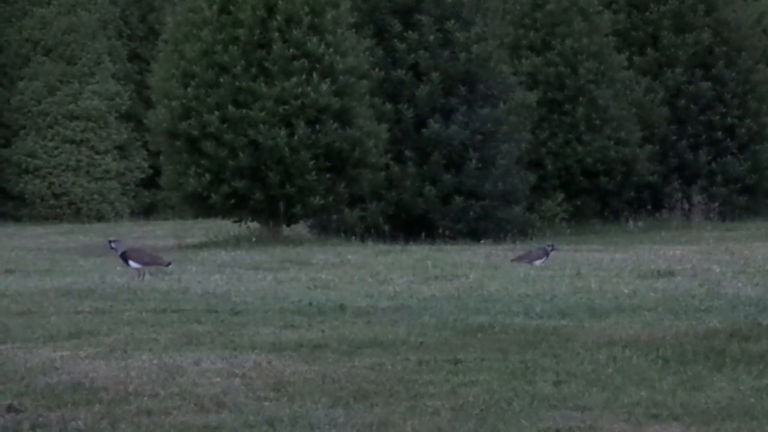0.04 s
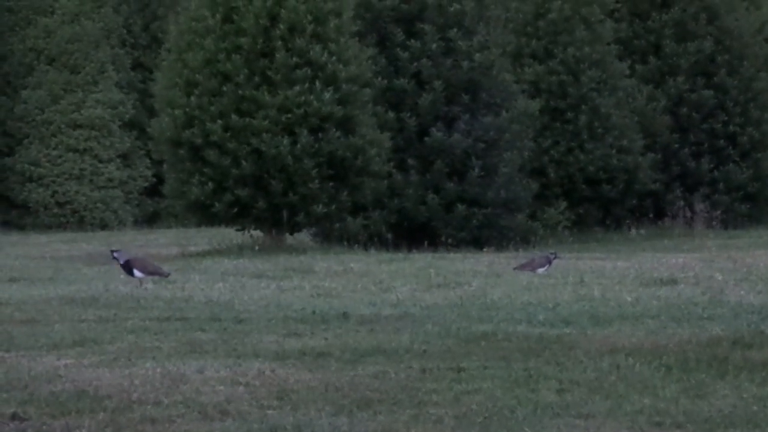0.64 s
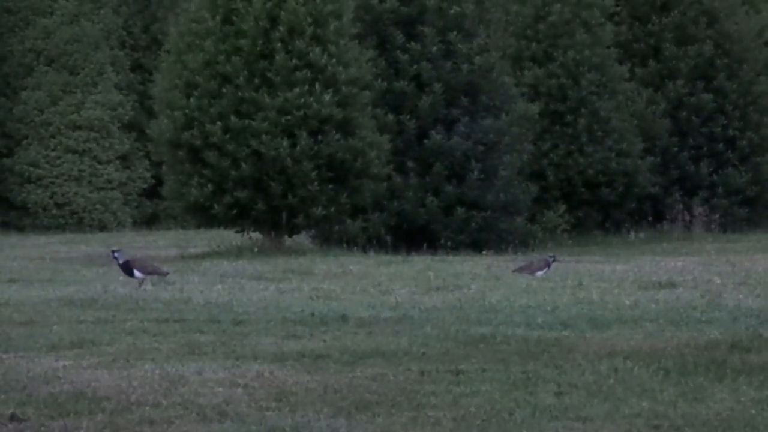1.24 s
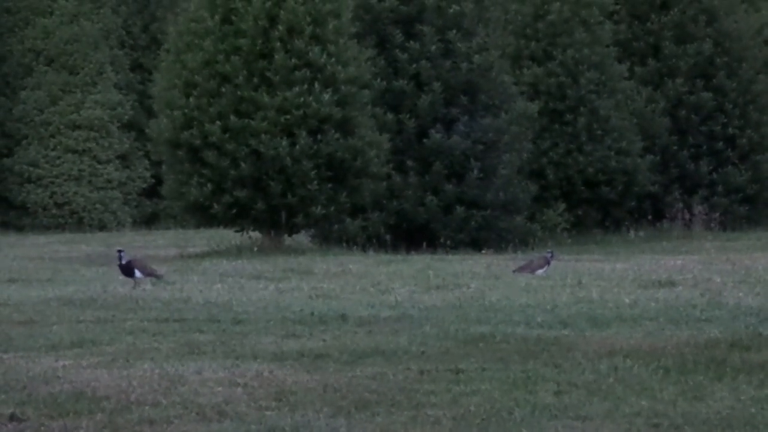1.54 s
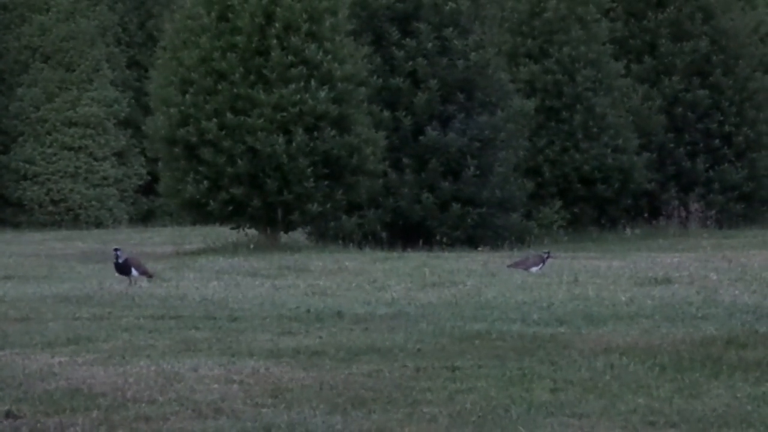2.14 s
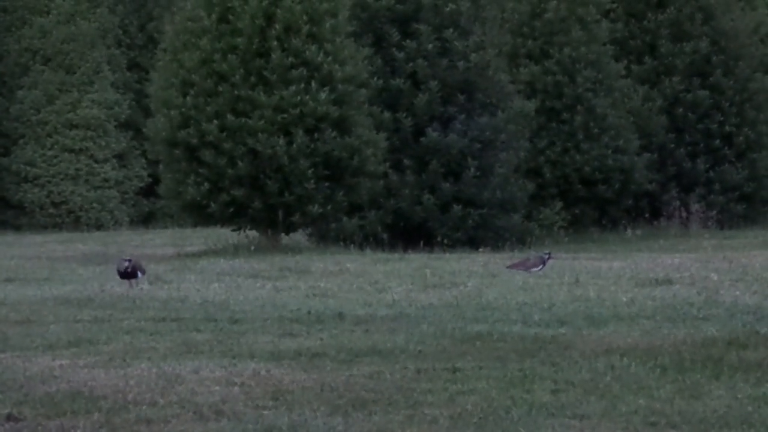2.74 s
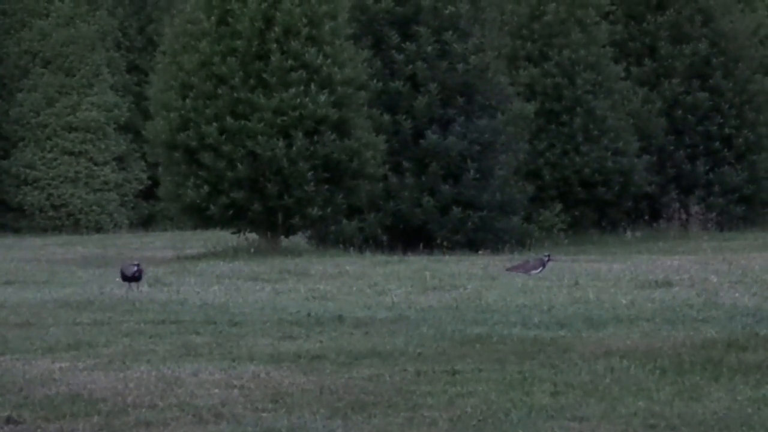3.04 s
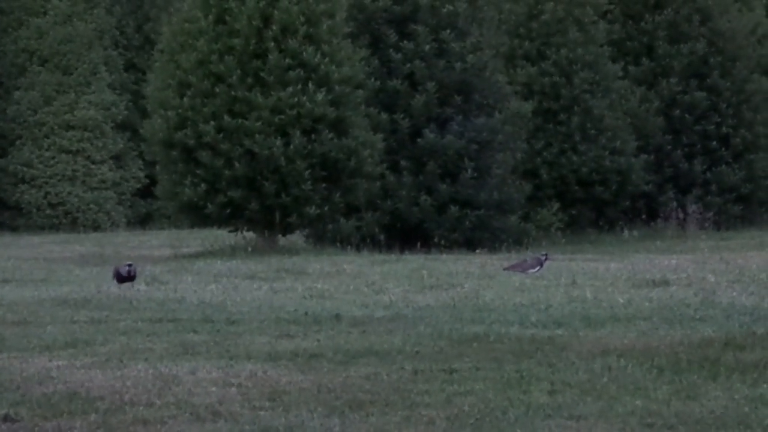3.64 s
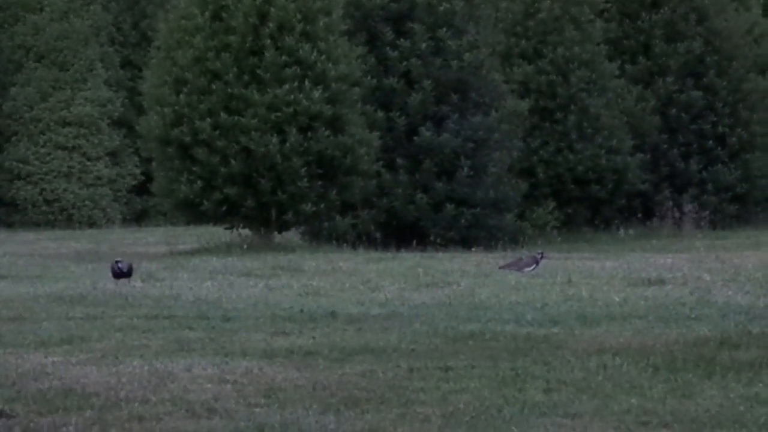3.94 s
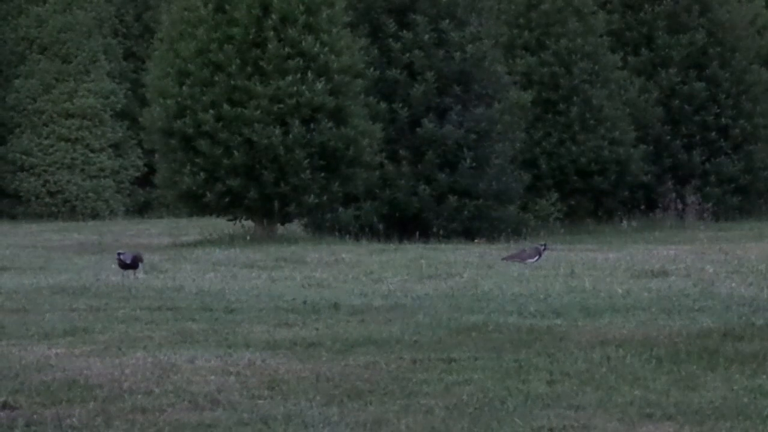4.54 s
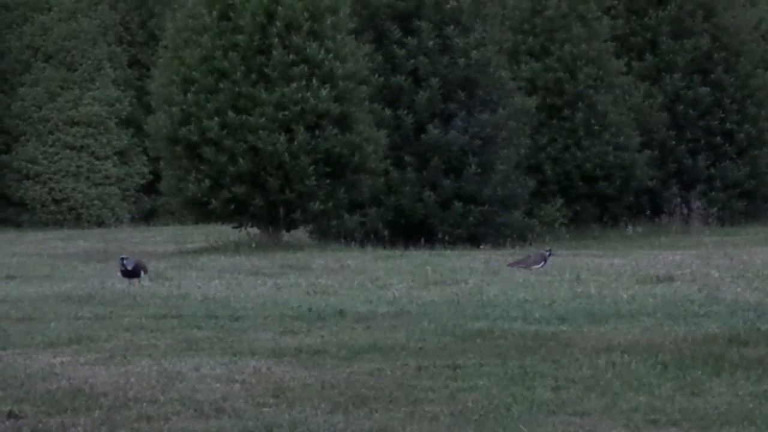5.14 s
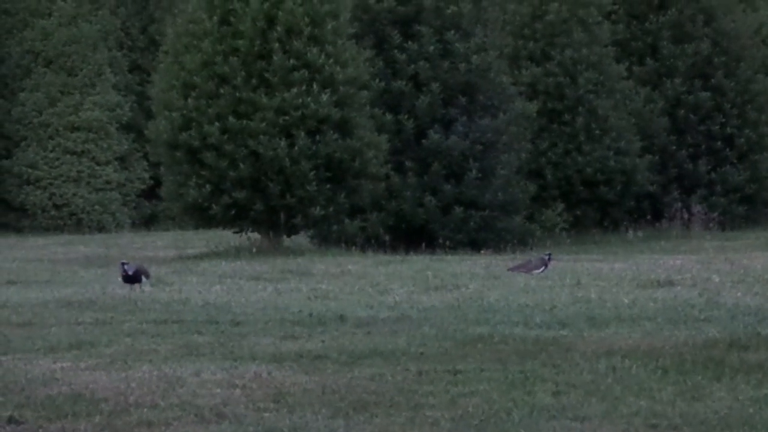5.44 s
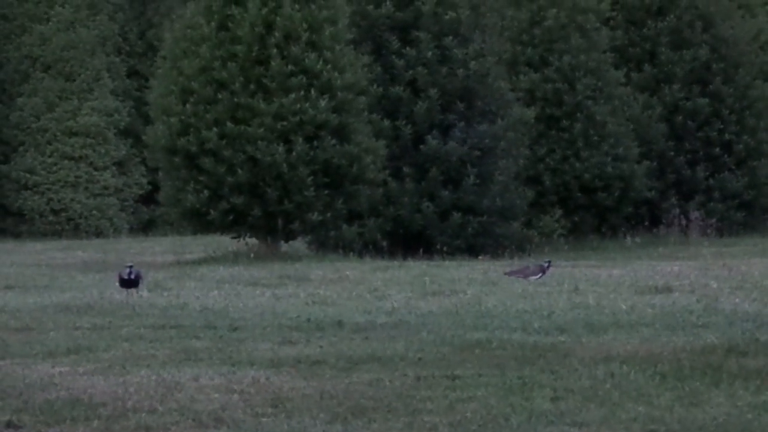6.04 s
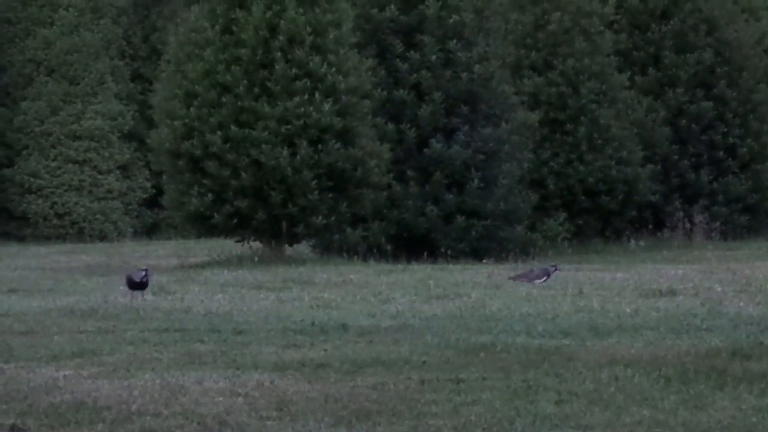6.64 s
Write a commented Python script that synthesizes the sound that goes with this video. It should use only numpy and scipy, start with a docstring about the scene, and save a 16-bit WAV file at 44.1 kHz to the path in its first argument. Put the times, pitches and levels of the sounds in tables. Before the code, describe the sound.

A lapwing repeats harsh, scratchy cries outdoors, with faint songbird whistles and two dull knocks over a distant rush and low hum.

```python
"""A lapwing's harsh cry sounds ten times over a lawn at dusk; a second bird answers once, more softly.
Each cry is a reedy harmonic series from the syrinx, filtered by throat and bill, whose pitch flicks
upward in an uneven rattle. The ground and the tree line reflect it. A distant songbird whistles in
gliding pure tones, something knocks twice, and a far rush with a low hum lies under everything."""
import sys
import numpy as np
from scipy import signal
from scipy.fft import rfft, irfft, next_fast_len
from scipy.io import wavfile
from scipy.ndimage import uniform_filter1d, map_coordinates

SR = 44100
rng = np.random.default_rng(int(sys.argv[2]) if len(sys.argv) > 2 else 0)


def file_out(sig):
    """Save sig as 16-bit WAV at sys.argv[1]."""
    # one column per channel
    cols = np.atleast_2d(sig).T
    # limit, then scale
    lim = np.clip(cols, -1, 1)
    pcm = np.round(lim * 32767).astype(np.int16)
    wavfile.write(sys.argv[1], SR, pcm)


N = 299880

# The near bird's cries: start t/s, end t/s, level/dB, swell/dB, second harmonic/dB, treble/dB,
# resting strain (0-1), closing sag/Hz, flick period/s, rattle duration/s,
# resting pitch f/Hz at each of the four stages, flick height/Hz at each of the last three
CRY_SCORE = [ (-.15, .2, -34.5, 0.56, -10.5, -19, .19, 80, .0305, .33, 930, 945, 934, 915, 60, 45, 170),
             (.499, .85, -34.2, .7, -10.5, -20, .17, 85, .030, .32, 910, 962, 942, 925, 95, 115, 190),
             (1.171, 1.54, -34, 1, -11, -16.5, .2, 150, .0358, .33, 935, 1018, 980, 964, 45, 25, 150),
             (1.878, 2.222, -34, 2.5, -12, -16.5, .08, 150, .0335, .18, 950, 998, 994, 962, 105, 135, 20),
             (2.65, 2.99, -35.3, 1.3, -9.5, -17.5, .09, 45, .0268, .31, 965, 1012, 1005, 965, 70, 55, 50),
             (3.313, 3.66, -35.5, 1.36, -9.5, -16.5, .08, 45, .0315, .17, 985, 1022, 998, 983, 49.5, 25, 20.5),
             (4.007, 4.35, -35.5, 2.1, -8, -16.5, .07, 40, .0305, .23, 1048, 1058, 1072, 1050, 165, 85, 20),
             (4.716, 5.06, -37, 2.6, -9, -16, .08, 45, .0312, .29, 875, 972, 1022, 1002, 65, 150, 180),
             (5.452, 5.775, -35.5, 1.5, -9.5, -16.5, .04, 45, .0315, .14, 1047, 1078, 982, 958, 170, 90, -0.5),
             (6.255, 6.602, -35.5, 2.4, -10.5, -16.5, .08, 105, .0332, .18, 992, 1018, 1013, 987, 55, 95, 14.5)]
# Response of the bird heard side-on: f/Hz, gain/dB
SIDE_ON_RESPONSE = [(2000, -.3), (3000, .6), (4100, -1.8), (5400, 0), (9000, .5), (11500, -2)]

def lapwing(turn_s=2.4):
    """Directivity: the timbre changes as the bird, side-on at first, turns to face the listener."""
    side_on = sum(cry(row) for row in CRY_SCORE if row[0] < turn_s)
    facing = sum(cry(row) for row in CRY_SCORE if row[0] >= turn_s)
    return coloured(side_on, SIDE_ON_RESPONSE) + facing


# Onset, early, middle and late stage of a cry: t/s from its start
STAGE_TIMES = [0, .1, .195, .295]

def cry(row, force=1, onset_s=.005, bite_s=.015, relax_s=.03, sag_s=.019, fade_s=.034):
    """Coupled modulation: each tightening of the syrinx raises the pitch, chokes the level and rasps."""
    start, end, db, swell_db, low_db, treble_db, rest_strain, sag_hz, period, lasts, *shape = row
    pitches, heights = shape[:len(STAGE_TIMES)], shape[len(STAGE_TIMES):]
    out, t = np.zeros(N), span(start, end)
    age, left = t - start, t[-1] - t
    rise_hz = rattle(age, period, lasts, heights, force)
    swing_hz = rise_hz - uniform_filter1d(rise_hz, round(2 * period * SR))
    # pitch and level collapse as the air runs out
    pitch_hz = np.interp(age, STAGE_TIMES, pitches) - sag_hz * np.exp(-left / sag_s) + rise_hz
    spent = np.exp(-left / fade_s)
    level_db = db + swell_db * np.sin(np.pi * age / (end - start)) - 6.5 * np.exp(-age / onset_s)
    level_db -= 7.5 * force * spent + .006 * swing_hz
    low_db += 3 * spent  # the lowest overtone gains on the others
    # strain bites at the onset, grows with the rattle and ebbs once it stops
    rattle_hz = np.interp(age, STAGE_TIMES[1:], heights) * np.exp(-np.maximum(age - lasts, 0) / relax_s)
    effort = rest_strain + .0011 * rattle_hz
    strain = np.maximum(effort + .6 * force * np.exp(-age / bite_s) + .0012 * swing_hz, 0)
    treble_db -= 10 * (effort - effort.mean())  # smooth stretches carry more high overtones
    jitter = .0035 + .017 * strain + .000035 * rise_hz  # the voice cracks atop a high flick
    add(out, t, amp(level_db) * voice(t, pitch_hz, low_db, treble_db, strain, jitter))
    t, scratch = closing_scratch(t[-1], pitch_hz[-1])
    add(out, t, amp(db - 10.5) * scratch)
    return out


# Transfer function of the throat and open bill: f/Hz, gain/dB
THROAT_RESPONSE = [(1600, 3), (2050, 0.5), (2500, -1.5), (3000, 1), (3500, -0.5), (4100, -3.5),
                   (4750, -17.5), (5400, -28.5), (6200, -22), (7000, -23), (8000, -25.5), (9300, -21.5),
                   (11000, -35.5), (14500, -43.5)]
SHRILL_HZ, SHRILL_WIDTH_HZ, SHRILL_DB_PER_STRAIN = 5340, 680, 39.2  # a resonance that strain opens

def voice(t, pitch_hz, low_db, treble_db, strain, jitter, waver=.0035, flutter_db=1.35, grit=.17):
    """Source and filter: harmonics sweep through the throat's resonances; uneven cycles blur them."""
    size = len(t)
    unevenness = jitter * wobble(650, size) + waver * wobble(70.3, size)
    phase = 2 * np.pi * np.cumsum(pitch_hz * (1 + unevenness)) / SR
    shrill_db = SHRILL_DB_PER_STRAIN * np.minimum(strain, .55)
    partials = []
    for k in range(2, 15):  # the fundamental does not carry
        hz = k * pitch_hz
        resonance = np.exp(-((hz - SHRILL_HZ) / SHRILL_WIDTH_HZ) ** 2)
        throat_db = along(THROAT_RESPONSE, hz) + shrill_db * resonance
        sidebands = wobble(500, size) * np.cos(k * phase) + wobble(500, size) * np.sin(k * phase)
        gain = amp(throat_db + flutter_db * wobble(68, size))
        harmonic = np.sin(k * phase + rng.uniform(0, 2 * np.pi))
        partials.append(gain * (harmonic + grit * k * strain * sidebands))
    low, body, treble = partials[0], sum(partials[1:5]), sum(partials[5:])
    shimmer = 1 + .083 * strain * wobble(600, size)
    gate = np.clip((t - t[0]) / .004, 0, 1) * np.clip((t[-1] - t) / .012, 0, 1)
    return gate * shimmer * (amp(low_db) * unit(low) + unit(body) + amp(treble_db) * unit(treble))


# The two flicks that open every cry: t/s from its start, height/Hz at full force
OPENING_FLICKS = [(.002, 120), (.028, 185)]

def rattle(age, period, lasts, heights, force, scatter_s=.001, uneven=.14, hiccup_hz=16):
    """Frequency modulation by pulses of tension: two opening flicks, an uneven train, stray hiccups."""
    opening_s, opening_hz = np.transpose(OPENING_FLICKS)
    train_s = opening_s[-1] + period * np.arange(1, 13)
    slip, size, stretch = rng.standard_normal((len(train_s), 3)).T
    train_hz = np.interp(train_s, STAGE_TIMES[1:], heights) * np.exp(uneven * size)
    train_hz = np.where(train_s < lasts, train_hz, hiccup_hz * np.abs(size))
    flick_s = np.r_[opening_s, train_s + scatter_s * slip]
    flick_hz = np.r_[force * opening_hz, train_hz]
    # higher flicks last longer; the first is halved
    length_s = (.02 + .00004 * flick_hz) * np.r_[.5, 1, np.exp(uneven * stretch)]
    pulses = np.cos(np.pi * np.clip((age[:, None] - flick_s) / length_s, -.5, .5)) ** 2
    return pulses @ flick_hz


def closing_scratch(end, pitch_hz, fall=.25):
    """Irregular oscillation: as the pressure runs out the voice breaks into a short, falling scratch."""
    t = span(end - .012, end + .027)
    progress = np.linspace(0, 1, len(t))
    rasp = voice(t, pitch_hz * (1 - fall * progress), low_db=-7.5, treble_db=-11, strain=.35,
                 jitter=.05, waver=.00413, flutter_db=1.25, grit=.73)
    return t, amp(-7 * progress) * rasp


# The second bird's cry: columns as in CRY_SCORE
ANSWER_CRY = (5.715, 6.046, -43.3, .5, -8, -16, .17, 25, .039, .32, 1038, 1075, 1075, 1068, 5, 25.5, 75)
# Response of a bird facing away: f/Hz, gain/dB
FACING_AWAY_RESPONSE = [(2100, 1.5), (3200, -5.5), (4300, 2.5), (5500, 2), (7200, -8), (9000, -3),
                        (11000, 9.5), (13000, 7)]

def second_lapwing():
    """Directivity: a bird facing away gives a softer, thinner cry that overlaps the ninth."""
    return coloured(cry(ANSWER_CRY, force=.2), FACING_AWAY_RESPONSE)


# A rise, an arch and a fall: t/s into the phrase, duration/s, first, middle and last f/Hz, gain/dB
MOTIF_NOTES = [(0, 0.051, 2280, 2530, 2850, 0.5), (.054, .055, 2980, 3620, 2960, -2),
               (.104, .034, 2900, 2550, 2150, -3)]
# Phrases of that motif: t/s, level/dB, number of notes sung
MOTIF_PHRASES = [(-.084, -49, 3), (.096, -48, 3), (1.99, -50, 3), (2.177, -47.5, 3), (2.912, -54, 1),
                 (4.835, -55, 1), (5.033, -48, 3), (5.71, -53, 1)]
# Single whistles: t/s, duration/s, first, middle and last f/Hz, level/dB
SINGLE_WHISTLES = [ (.62, .15, 3730, 3530, 3470, -51), (1.089, .13, 3280, 3280, 3000, -56),
                   (2.054, .3, 2680, 2670, 2670, -52), (2.752, .16, 3810, 3560, 3360, -50),
                   (3.283, .24, 2850, 2690, 2620, -53), (3.845, .16, 3150, 3290, 3600, -58.5),
                   (5.13, 0.179, 2642, 2740, 2640, -47), (5.567, 0.15, 3650, 3520, 3380, -50),
                   (6.067, .098, 2210, 2650, 2220, -52.5), (6.216, 0.029, 3470, 3600, 3450, -51.5)]

def songbird(waver=.0084):
    """Frequency glide: each distant note is a pure tone bending along a parabola through three pitches."""
    out = np.zeros(N)
    sung = [(start + after, *note, db + note_db)
            for start, db, count in MOTIF_PHRASES for after, *note, note_db in MOTIF_NOTES[:round(count)]]
    for start, length, *pitches, db in sung + SINGLE_WHISTLES:
        if start < 0:
            continue
        t = span(start, start + length)
        progress = np.linspace(0, 1, len(t))
        glide_hz = np.polyval(np.polyfit([0, .5, 1], pitches, 2), progress)
        hz = glide_hz * (1 + waver * wobble(204, len(t)))
        swell = np.sqrt(2 * np.abs(np.sin(np.pi * progress))) * amp(db + 1.1 * wobble(54, len(t)))
        add(out, t, swell * np.sin(2 * np.pi * np.cumsum(hz) / SR))
    return out


# Two knocks, the first with a quick rebound: t/s, level/dB
IMPACTS = [(2.4774, -25), (2.4814, -30), (5.498, -32.5)]
# Modes of the struck object: f/Hz, relative level/dB, decay time T60/s
STRUCK_MODES = [(615, -23, 0.027), (760, -4.5, 0.014), (1133, -8, 0.033), (1526, -10, 0.024),
                (2900, -20, 0.01)]

def knocks(band_hz=(380, 2200)):
    """Free vibration: impacts excite damped modes, band-passed to a dull knock with little bass."""
    out = np.zeros(N)
    for start, db in IMPACTS:
        t = span(start, start + .1)
        age = t - t[0]
        for hz, mode_db, t60 in STRUCK_MODES:
            add(out, t, amp(db + mode_db - 60 * age / t60) * np.sin(2 * np.pi * hz * age))
    return signal.sosfilt(signal.butter(2, band_hz, "bandpass", fs=SR, output="sos"), out)


def echo(x, decay_times, delay_s):
    """Diffuse reflection: convolution with a noise tail in which each frequency decays at its own rate."""
    hz, t, spectrum = signal.stft(rng.standard_normal(SR), SR, nperseg=256)
    decay = amp(-60 * t / along(decay_times, hz)[:, None])
    tail = signal.istft(spectrum * decay, SR, nperseg=256)[1]
    tail = np.pad(tail / np.linalg.norm(tail), (round(delay_s * SR), 0))
    return signal.fftconvolve(x, tail)[:N]


# Reverberation of the tree line: f/Hz, decay time T60/s
TREE_DECAY = [(300, 0.25), (1000, 2.2), (3000, 0.89), (5000, 0.78), (10000, 0.19)]

def tree_line(x):
    """Scattering and absorption: foliage returns the sound late, and leaves soak up some treble."""
    return coloured(echo(x, TREE_DECAY, delay_s=.035), [(2000, 3), (4000, -2), (7000, 1.5), (12000, -1)])


# Spectra of the far rush and its rumble: f/Hz, relative spectral level/dB
RUSH_SPECTRUM = [(25, -15), (100, -15), (175, -12), (250, -12.5), (440, -8), (680, -1), (900, -1),
                 (1100, 3), (1540, -7), (1910, -7), (2500, -14), (2930, -10.5), (3830, -18), (4500, -22),
                 (15000, -24)]
RUMBLE_SPECTRUM = [(25, -12), (48, -2.5), (70, -0.5), (90, -2.5), (140, -7), (260, -18.5), (600, -71)]
# Lines of the hum: f/Hz, level/dB
HUM_LINES = [(70, -76.5), (141, -82), (716, -66), (1075, -68), (1432, -69)]

def background(rush_fall_db_per_s=.5, rumble_fall_db_per_s=1.36, whine_hz=12290, whine_db=-85):
    """Continuous and line spectra: rush, rumble, an unsteady hum and a faint whine, all slowly fading."""
    t = span(0, N / SR)
    rush_db = -48 - rush_fall_db_per_s * t
    rush = amp(rush_db + .32 * wobble(9.4, N)) * noise(RUSH_SPECTRUM)
    rumble = amp(-63 - rumble_fall_db_per_s * t + 1.7 * wobble(5.06, N)) * noise(RUMBLE_SPECTRUM)
    hum = np.zeros(N)
    for hz, db in HUM_LINES + [(whine_hz, whine_db)]:
        peak = np.sqrt(2) * amp(db + 2 * wobble(2.97, N))
        hum += peak * np.sin(2 * np.pi * hz * t + .9 * wobble(14, N))
    return rush + rumble + amp(rush_db - rush_db.mean()) * hum


def amp(db):
    """Amplitude ratio of a level in decibels."""
    return 10 ** (np.asarray(db) / 20)


def unit(x):
    """Normalisation to rms 1."""
    return x / np.sqrt(np.mean(x ** 2) + 1e-20)


def along(points, hz):
    """Interpolation of (f/Hz, value) points on a logarithmic frequency axis."""
    frequencies, values = np.transpose(points)
    return np.interp(np.log(hz + 1), np.log(frequencies), values)


def span(start, end):
    """Sample times t/s from start to end, within the scene."""
    return np.arange(max(round(start * SR), 0), min(round(end * SR), N)) / SR


def add(track, t, sound):
    """Superposition of a sound on a track at the times t."""
    track[round(t[0] * SR):][:len(t)] += sound


def wobble(rate, size):
    """Random modulation: a smooth curve through rate Gaussian values a second."""
    knots = rng.standard_normal(int(size * rate / SR) + 4)
    return map_coordinates(knots, [np.arange(size) * rate / SR])


def filtered(x, response):
    """Linear filtering: the spectrum of x times a function of frequency."""
    size = next_fast_len(N + SR // 4)
    return irfft(rfft(x, size) * response(np.fft.rfftfreq(size, 1 / SR)), size)[..., :N]


def coloured(x, points):
    """Spectral shaping by a curve of (f/Hz, gain/dB) points."""
    return filtered(x, lambda hz: amp(along(points, hz)))


def noise(spectrum):
    """Gaussian noise of the given spectrum and rms 1."""
    return unit(coloured(rng.standard_normal(N), spectrum))


def scene():
    """Superposition: birds and knocks at centre, reflections from ground and trees, and the background."""
    birds = lapwing() + second_lapwing() + songbird()
    thuds = knocks()
    ground = echo(birds + amp(6) * thuds, [(1000, .22), (4000, .18), (10000, .13)], delay_s=.008)
    trees = tree_line(birds + thuds)
    mid = birds + thuds + amp(-14) * ground + amp(-17.5) * trees + background()
    # only a trace of hiss separates left from right
    side = amp(-82.5) * noise([(50, 4), (200, 2), (1000, -2.5), (3000, -8.5), (14000, -7.5)])
    return np.array([mid + side, mid - side])


def record(dry, bass_hz=38, top_hz=15080):
    """Band limiting: a second-order roll-off of the deepest bass and a sharp cut of the highest treble."""
    return filtered(dry, lambda hz: (hz < top_hz) * hz ** 2 / np.hypot(hz ** 2, bass_hz ** 2))


dry = scene()
out = record(dry)
file_out(out)
```